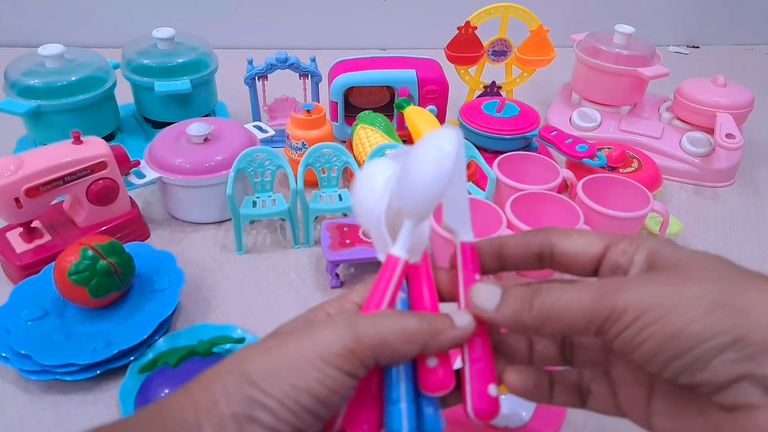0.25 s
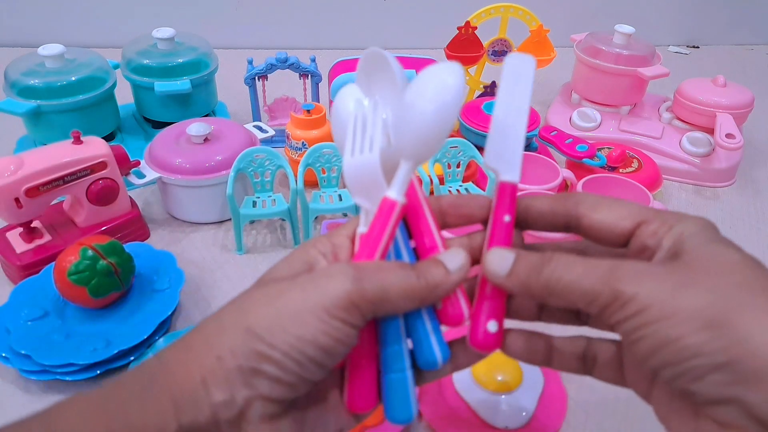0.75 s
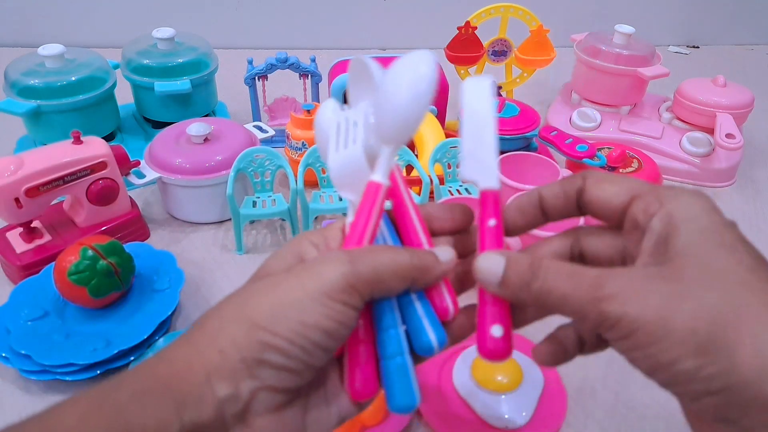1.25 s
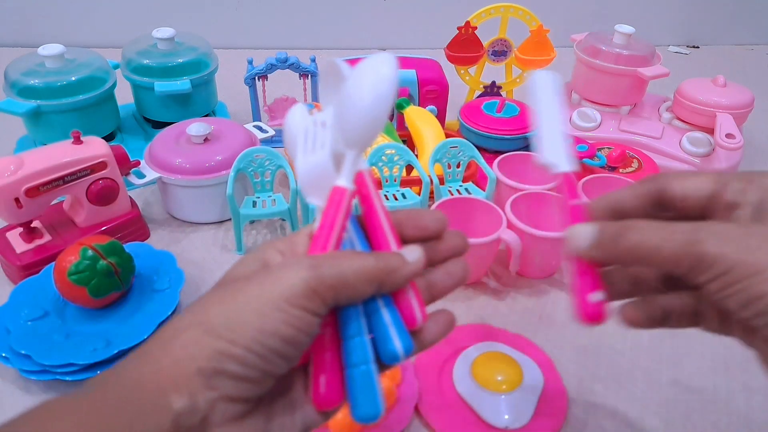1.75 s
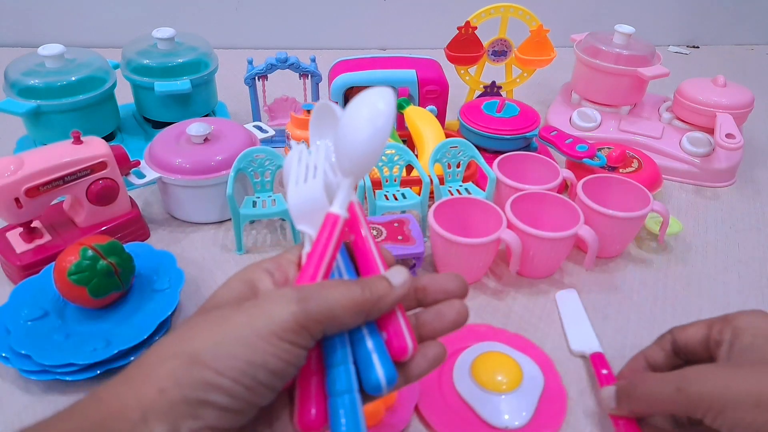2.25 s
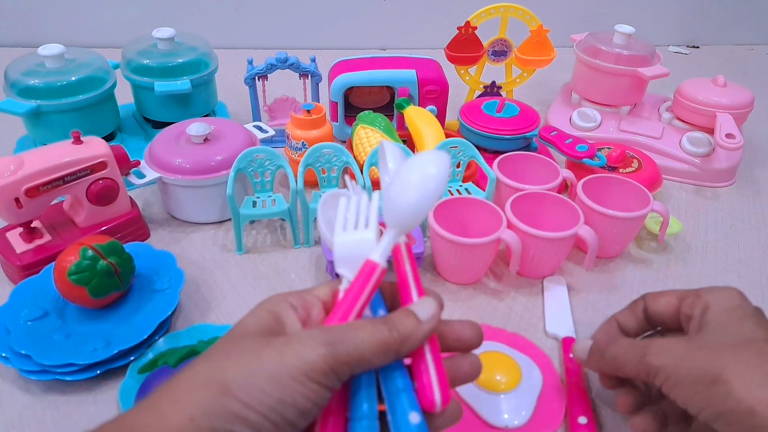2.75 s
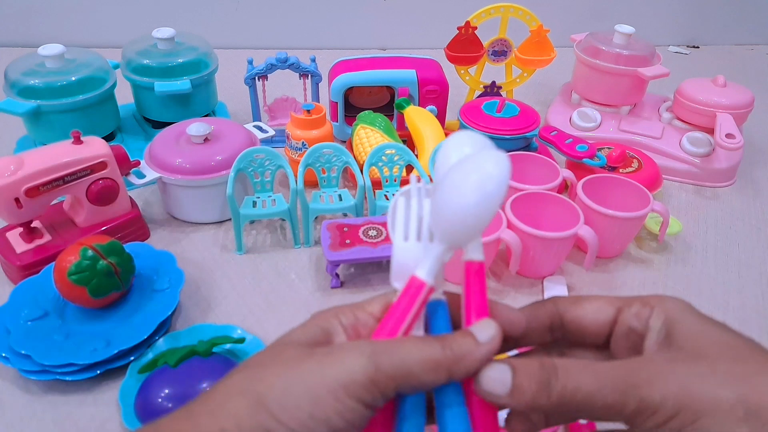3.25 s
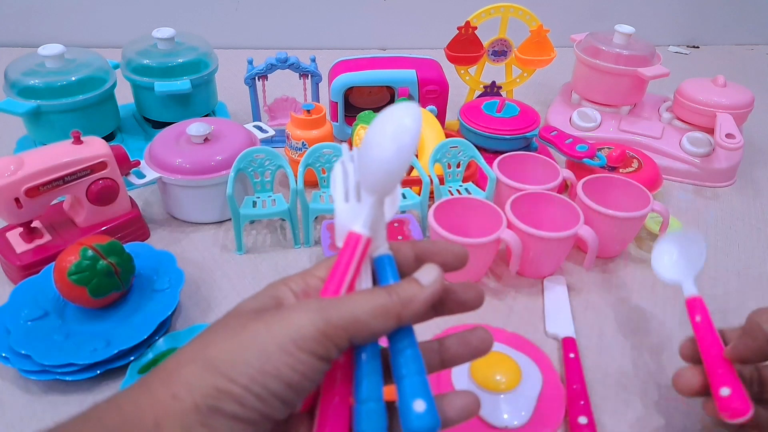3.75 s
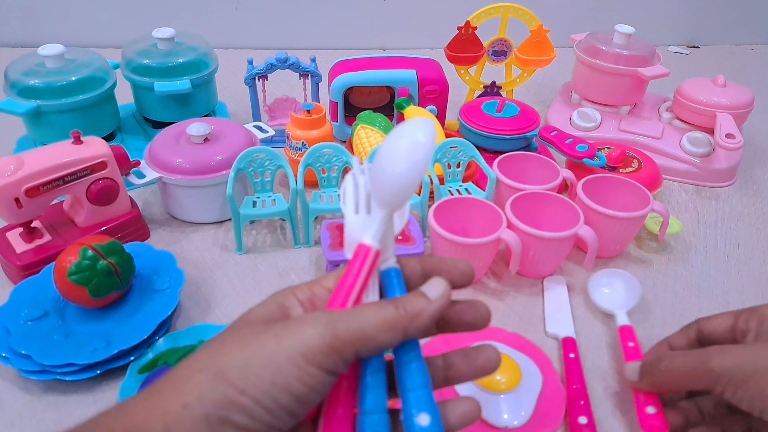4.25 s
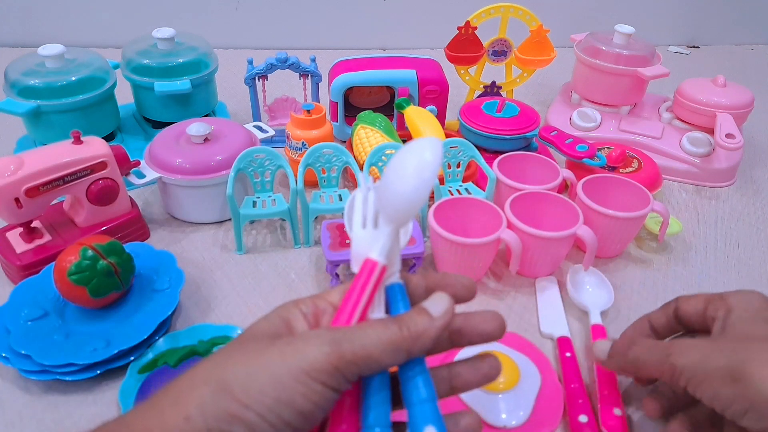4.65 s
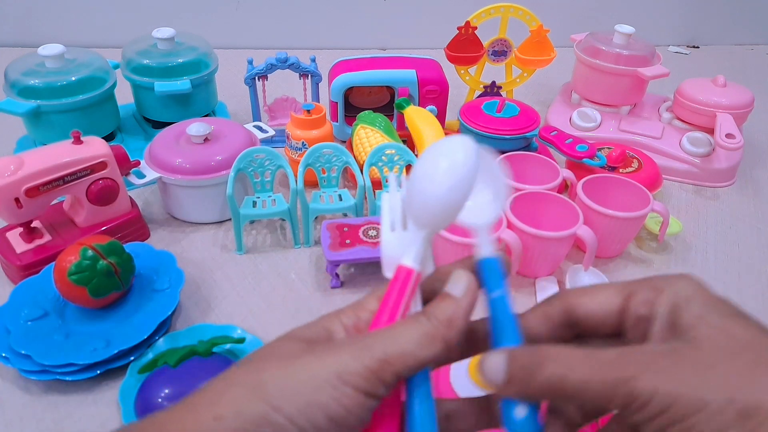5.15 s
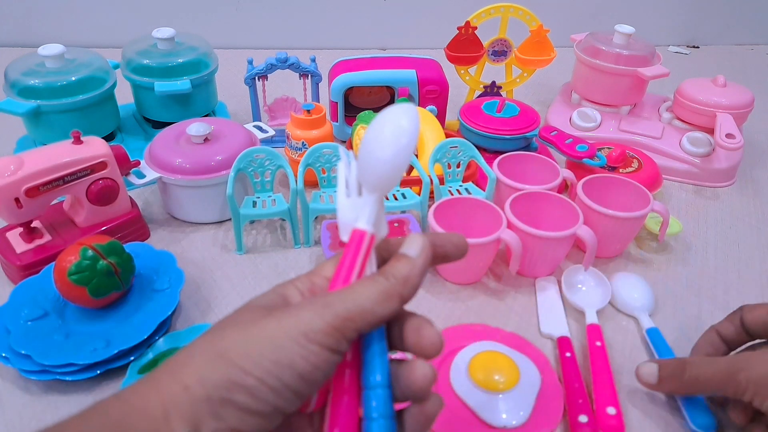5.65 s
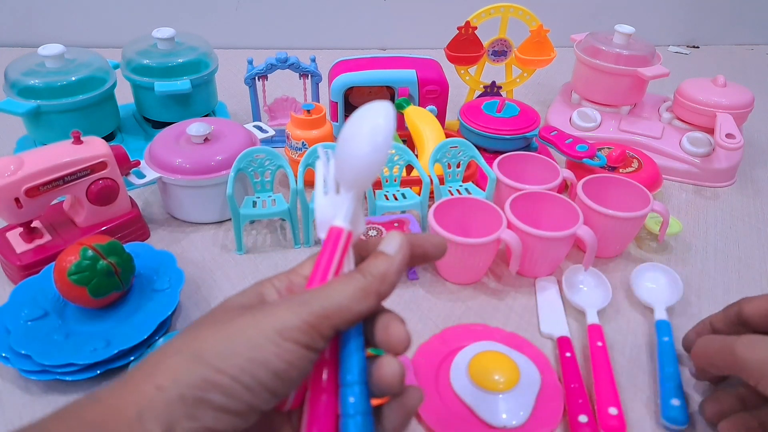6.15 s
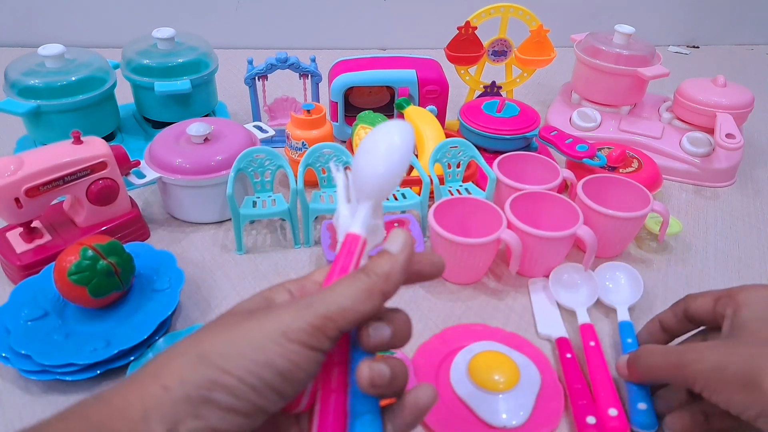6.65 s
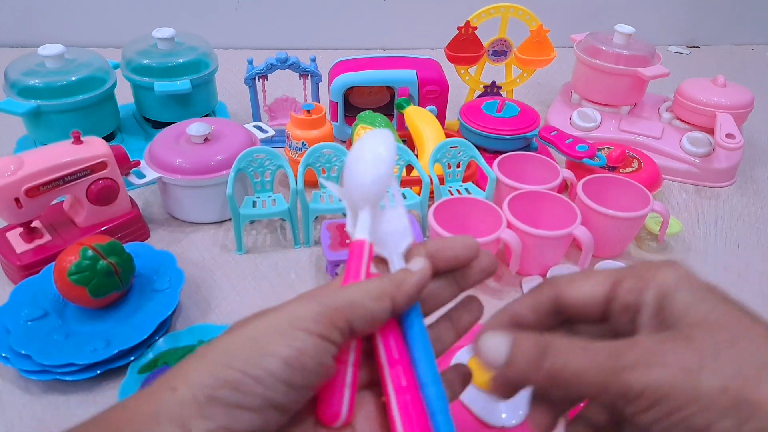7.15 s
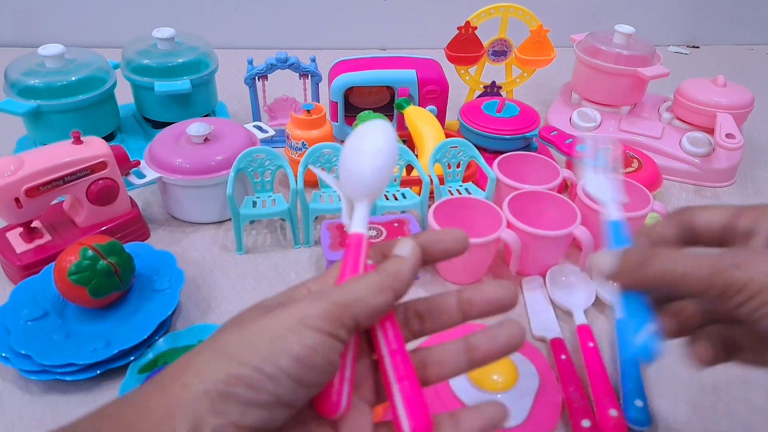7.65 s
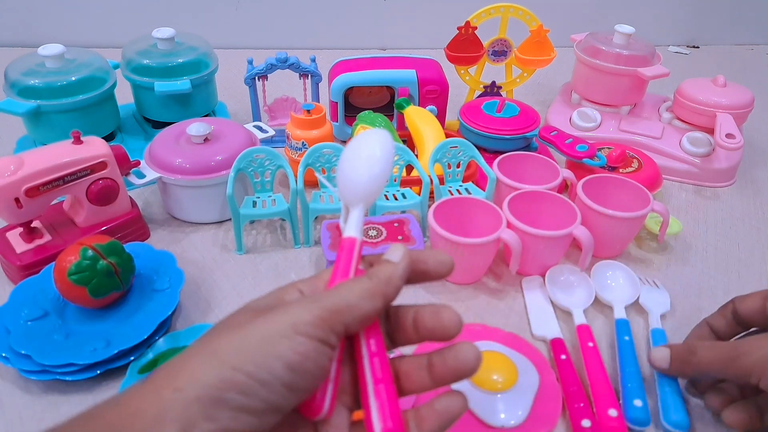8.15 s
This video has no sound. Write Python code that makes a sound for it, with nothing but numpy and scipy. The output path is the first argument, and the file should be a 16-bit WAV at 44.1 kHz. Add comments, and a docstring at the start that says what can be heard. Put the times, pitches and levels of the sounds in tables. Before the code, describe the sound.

Close-up handling of light plastic toy cutlery: dry, bright clicks in uneven little groups, separated by quiet gaps. Soft fluttering friction swells as pieces slide from the bunch, and firmer hollow taps land on the tabletop, the strongest just before six seconds. The small hard room answers briefly. A constant muffled rumble with a faint unsteady low hum fills the pauses, with barely any hiss.

```python
"""Over a dull steady rumble and a wavering low hum, hollow plastic toy cutlery ticks and taps in a small bare room.
Hands pull pieces from a bunch and lay them on a table: each contact is a crack plus a noise rattle through modes.
Soft noise swells around the ticks, fluttering bright and grainy dull, dying away at about the room's rate.
Decaying noise gives the echoes, filtered noise the rumble and hum. Two spaced microphones, the right one nearer."""
import sys
import numpy as np
from scipy import signal
from scipy.fft import rfft, irfft
from scipy.io import wavfile

SR = 44100
rng = np.random.default_rng(int(sys.argv[2]) if len(sys.argv) > 2 else 0)


def pcm_store(signal):
    """Save signal as 16-bit PCM."""
    levels = np.round(np.clip(np.atleast_2d(signal), -1, 1) * 32767)
    wavfile.write(sys.argv[1], SR, levels.astype(np.int16).T)


N = 370440

# Plastic contacts. Each row: start in s, bowl level in dB before resonances, then relative to the bowl
# table thud in dB, hollow handle in dB, bright tick in dB, top edge in dB; then left minus right in dB, room send in dB.
CONTACTS = [(0.153, -44, -33, -11.5, -1.5, -4, -1, -8), (0.1753, -53, -24, -8, 9.5, -2, -6, -7.5),
            (0.28, -73, -9, 11, 12, -3, 2, -3), (0.3669, -56.5, -22, -7, 5, -6, -2, -10),
            (0.521, -67.5, 9.5, -1, 9, 2, -1, -3.5), (0.6003, -57.5, -21, -1.5, -3, 5, 3, -20),
            (0.6154, -55, -25, -20, 2, -8, -8, -17), (0.6235, -45, -15.5, -16, 2.5, 7.5, -5, -6),
            (0.745, -68, 0.5, -30, 10.5, 12, -3, -2.5), (1.24, -64.5, -13.5, -10.5, -1, -8.5, -2, -7.5),
            (1.261, -54.5, 0, -15, 7.5, 4.5, -1, -11), (1.4174, -47, -11, -11.5, 4.5, -7.5, 3, -1.5),
            (1.4253, -24, -22, -23.5, -3.5, 0, -3, 1), (1.586, -33.5, -34.5, -12, -7, -14, 0, -2.5),
            (1.5963, -20, -28, -22.5, -12, -0.5, -5, 0.5), (2.049, -68.5, -2, -8.5, 9, 13, 1, 1),
            (2.3501, -67, -8, -2, 14.5, 27, -6, -13), (2.5382, -79.5, 4, 22, 9, -18, 2, 3),
            (2.971, -72, 6, -18, -15, -19, -6, 2), (3.115, -56.5, -26, -4.5, -3, -2, -7, -3.5),
            (3.9479, -39, -1, -16.5, -3, -0.5, -2, 2.5), (4.133, -34.5, -5, -3.5, -46, -8, -1.5, -0.5),
            (4.54, -53.5, -13, -19, -7, -20, -1, 2.5), (4.563, -61, -8, -9, -5, -20, -5, -8),
            (4.666, -40, -9.5, -3.5, -17, -26, -1, -2), (5.188, -71, -3.5, -17.5, 6, 23.5, -7, -5),
            (5.234, -68, 9, -8, 16.5, 26, -2, -7.5), (5.6841, -25, -15.5, -11.5, -2.5, -12.5, -1.5, 1),
            (5.6983, -26, -21, -16, -10.5, -10, -4, -2.5), (5.7302, -17, -15.5, -11.5, -5.5, -14, -0.5, 0),
            (5.7539, -32.5, -22.5, -6.5, -4.5, -15, -9, -5), (6.0485, -51.5, -11.5, -4, -12, -24, -3, -1),
            (6.061, -48.5, -19, 1.5, -9, -16.5, -3, -2.5),
            (6.2209, -27, -11.5, -5.5, -26.5, -4.5, -1.5, 1.5),
            (6.253, -19.5, -16.5, -11.5, -3.5, -17.5, -1.5, -3.5),
            (6.6332, -52, 1.5, -1.5, 7.5, 4.5, -2, -0.5), (6.6671, -53.5, 4.5, -3, 1, 1, -1, -3),
            (6.837, -67.5, -1.5, -10, 3.5, -9, -3, 6), (6.8742, -65, 14, -3, -9, -13, -1, 4.5),
            (6.9722, -65, 15.5, 15, 8, -11, 0, 4), (7.0177, -60.5, 15.5, 11, -5, -15, 0, -4),
            (7.0736, -59, -15, -23, 8.5, 8.5, -3, -7), (7.1106, -70.5, 20, 9, 0, -10, -1, -2),
            (7.2329, -60.5, -4, 10, 19, 19.5, 0, -6), (7.607, -81.5, -10, -20, 11, 4, 1, -12),
            (7.7567, -77.5, -9.5, -23.5, 27, 19.5, -1.5, -7.5), (8.064, -78, 11, -9.5, 17, 2, -7, 5),
            (8.1335, -24.5, -12.5, -10, -7.5, -16, -1.5, 1), (8.191, -40.5, -39, -7, -19, -4.5, -10, 0.5)]
# Clusters of modes too dense to tell apart in thin damped plastic, in the order thump, thud, handle, stem, bowl,
# bright tick, top edge. Each row: low edge in Hz, high edge in Hz, t60 in s, share alike in both microphones 0-1.
MODE_CLUSTERS = [(70, 210, 0.29, 0.93), (193, 564, 0.058, 0.98), (636, 1765, 0.097, 0.2),
                 (1750, 2900, 0.051, 0.03), (2930, 4940, 0.022, 0.2), (4960, 8600, 0.029, 0),
                 (8800, 14000, 0.015, 0.4)]
# Clearest modes of the piece in hand: knife, spoon, ladle, fork.
# Each row: in hand from s, three mode frequencies in Hz, their mean resonance gains in dB.
FREE_MODES = [(0, 2610, 3750, 5170, -5, -1, -4), (2.8, 1750, 2620, 3440, -18, -5, -6.5),
              (5.0, 2550, 3110, 4300, -7.5, -6, -7.5), (6.5, 1874, 3070, 4304, -8, -11.5, -10)]
# Table top under the toys. Each row: frequency in Hz, width in Hz, resonance gain in dB.
TABLE_MODES = [(113, 40, 1), (310, 43, 3), (420, 67, -2), (1106, 240, 4)]
FREE_MODE_WIDTH_HZ, RING_SPREAD_DB = 290, 2  # how strongly the free modes ring varies from contact to contact
THUMP_RE_THUD_DB = -12
STEM_FOLLOWS_HANDLE, STEM_OFFSET_DB = 0.6, 5  # share of the handle's dB, then offset
CRACK_RE_RATTLE = 4  # amplitude ratio at the microphones
RATTLE_TO_ROOM = 0.045  # rattle amplitude beside the unit crack sent to the walls; makes each tail's colour uneven
LEFT_LAG_S = 0.00016


def taps():
    """Contacts: a crack and short rattle excite every mode cluster; returns left, right and room-send rows."""
    start_s, bowl_db, thud_db, handle_db, bright_db, edge_db, pan_db, room_db = np.transpose(CONTACTS)
    stem_db = STEM_OFFSET_DB + STEM_FOLLOWS_HANDLE * handle_db
    cluster_db = [thud_db + THUMP_RE_THUD_DB, thud_db, handle_db, stem_db, 0, bright_db, edge_db]
    t = np.arange(SR // 14) / SR
    own, right = np.moveaxis(rng.standard_normal((len(start_s), 2, len(t))), 1, 0)
    ring_db = RING_SPREAD_DB * rng.standard_normal((len(start_s), 3))
    crack = np.broadcast_to(t == 0, own.shape)
    sound = 0
    for k, ((low_hz, high_hz, t60_s, share), colour_db) in enumerate(zip(MODE_CLUSTERS, cluster_db)):
        left = share * right + np.sqrt(1 - min(share, 1) ** 2) * own
        at_left = left + CRACK_RE_RATTLE * crack
        at_right = right + CRACK_RE_RATTLE * crack
        to_room = crack + RATTLE_TO_ROOM * own
        dying = np.array([at_left, at_right, to_room]) * from_db(-60 * t / t60_s)
        band = bandpass(dying + 1e-18, low_hz, high_hz)
        level = np.sqrt(np.sum(band ** 2, axis=2, keepdims=True) / (SR * 0.002))  # energy as if spread over 2 ms
        sign = (-1) ** k  # alternates so that neighbouring clusters join
        sound = sound + sign * band / level * from_db(bowl_db + colour_db)[:, None]
    out = np.zeros((3, N + SR))
    path_gains = from_db([pan_db / 2, -pan_db / 2, room_db])
    for k, at_s in enumerate(start_s):
        piece = [row for row in FREE_MODES if row[0] <= at_s][-1]
        free = [(hz, FREE_MODE_WIDTH_HZ, db + extra) for hz, db, extra in zip(piece[1:4], piece[4:], ring_db[k])]
        ringing = add_resonances(sound[:, k], free)
        for path, lag_s in enumerate([LEFT_LAG_S, 0, 0]):
            i = round((at_s + lag_s) * SR)
            out[path, i:i + len(t)] += path_gains[path, k] * ringing[path]
    return add_resonances(out[:, :N], TABLE_MODES)


# Soft noise swells around the ticks. Each row: time of full level in s, rise in s, hold in s,
# nominal bright level in dB, nominal dull level in dB.
SWELLS = [(0.0, .01, 0.033, -71, -91), (0.136, 0.024, 0.049, -60, -73), (0.306, .06, 0.011, -54.5, -75),
          (0.471, 0.035, 0.11, -65.5, -86), (0.621, 0.027, 0.035, -55.5, -62), (1.025, 0.2, .0, -74, -75.5),
          (1.102, 0.045, .0, -75, -76), (1.272, 0.085, 0.0052, -58, -68), (2.068, 0.031, .0, -66.5, -80),
          (2.362, 0.019, 0.0031, -56.5, -62.5), (2.54, 0.031, 0.16, -73.5, -63),
          (3.119, 0.018, 0.037, -67, -73), (3.497, 0.14, 0.077, -77, -74.5),
          (4.27, 0.044, 0.0092, -68, -62), (4.302, .02, 0.073, -66.5, -64),
          (4.556, 0.068, 0.0043, -70, -58.5), (5.081, .03, 0.019, -73, -90.5),
          (5.191, 0.054, .0, -66.5, -78.5), (5.238, 0.017, 0.0074, -63.5, -78.5),
          (6.64, 0.22, 0.032, -54, -55), (6.886, 0.14, .0, -71, -56.5), (7.022, 0.11, 0.0086, -57, -60),
          (7.241, 0.021, 0.02, -54, -69), (7.565, 0.13, .0, -72.5, -78), (7.755, 0.093, .0, -69.5, -89)]
# Bright noise colour. Each row: frequency in Hz, relative density in dB.
BRIGHT_COLOUR = [(1180, -28), (2000, -5), (2620, -16.5), (2860, -12.5), (4820, -9), (7770, -8),
                 (16000, -13.5)]
# Dull noise colour. Each row: frequency in Hz, relative density in dB.
DULL_COLOUR = [(350, -45), (600, -4.5), (914, -5), (1220, -7.5), (1390, -13), (2560, -11.5), (4000, -33),
               (5200, -43.5), (8800, -120)]
BRIGHT_DECAY_DB_PER_S, DULL_DECAY_DB_PER_S = 150, 168.5  # about the room's own rate
BRIGHT_FLOOR_DB, DULL_FLOOR_DB = -84, -77.5  # nominal level between swells


def noise_swells():
    """Soft noise around the ticks: a fluttering bright part and a grainy dull part with the table resonances."""
    bright_db, dull_db = np.transpose(SWELLS)[3:]
    bright = rms_one(diffuse_noise(N, BRIGHT_COLOUR)) * from_db(1.7 * drift(60))
    bright = bright * swell_gain(bright_db, BRIGHT_DECAY_DB_PER_S, BRIGHT_FLOOR_DB)
    grainy = diffuse_noise(N, DULL_COLOUR) * grains()
    dull = rms_one(add_resonances(grainy, TABLE_MODES)) * from_db(1.0 * drift(40))
    dull = dull * swell_gain(dull_db, DULL_DECAY_DB_PER_S, DULL_FLOOR_DB)
    return (bright + dull) * from_db([[-1.5], [1.5]])  # left, right


ONSET_DB = 27  # slope of the onset: this many dB per rise time


def swell_gain(peaks_db, decay_db_per_s, floor_db):
    """Gain over time: each swell grows, holds and dies away at a steady dB rate over a floor; powers add."""
    t = np.arange(N) / SR
    power = from_db(2 * floor_db)
    for (full_s, rise_s, hold_s, *_), peak_db in zip(SWELLS, peaks_db):
        before_db = ONSET_DB * np.maximum(full_s - t, 0) / max(rise_s, 0.002)
        after_db = decay_db_per_s * np.maximum(t - full_s - hold_s, 0)
        below_db = np.minimum(before_db + after_db, 90)
        power = power + from_db(2 * (peak_db - below_db))
    return np.sqrt(power)


GRAINS_PER_S, GRAIN_DECAY_S = 180, 0.002
GRAIN_MIN_DB, GRAIN_SPREAD_DB = -4, 4.0  # smallest grain against the steady gain, scale of the excess


def grains():
    """Short decaying gain bumps of uneven size at random moments over a steady gain."""
    sizes = from_db(GRAIN_MIN_DB + GRAIN_SPREAD_DB * np.minimum(rng.exponential(1, N), 4))
    bumps = sizes * (rng.random(N) < GRAINS_PER_S / SR)
    decay = np.exp(-1 / (GRAIN_DECAY_S * SR))
    return rms_one(1 + signal.lfilter([1], [1, -decay], bumps))


# Reverberation time. Each row: frequency in Hz, t60 in s.
ROOM_T60 = [(200, 0.87), (530, 0.53), (1390, 0.43), (3680, 0.39), (9700, 0.35)]
# Echo colour, also the hum's source noise. Each row: frequency in Hz, relative density in dB.
ROOM_COLOUR = [(100, -11.5), (250, -3), (600, 0.5), (1500, 1.5), (4000, 2.5), (7000, 0.5), (9000, 0),
               (11000, 1.5), (16000, -1)]
ROOM_GAIN_DB = -37
WALLS_S, EARLY_DB = 0.023, -6.5  # time until the walls answer, gain of the first echoes


def room(x):
    """Reverberation: thin echoes off table and toys, then the walls answer and die away band by band."""
    t = np.arange(SR) / SR
    edges_hz = 100 * 2 ** np.arange(0, 7.6, 0.5)
    noise = diffuse_noise(SR, ROOM_COLOUR)
    tail = 0
    for k, (low_hz, high_hz) in enumerate(zip(edges_hz, edges_hz[1:])):
        t60_s = at_hz(ROOM_T60, np.sqrt(low_hz * high_hz))
        tail = tail + (-1) ** k * bandpass(noise, low_hz, high_hz) * from_db(-60 * t / t60_s)
    build_up = from_db(EARLY_DB * np.clip(1 - t / WALLS_S, 0, 1) ** 0.23)
    return from_db(ROOM_GAIN_DB) * signal.fftconvolve(x[None], tail * build_up, axes=1)[:, :N]


# Steady rumble colour. Each row: frequency in Hz, relative density in dB.
RUMBLE_COLOUR = [(15, -59), (25, -19), (36, -22.5), (53, -18), (145, -13), (256, -4.5), (373, -4),
                 (416, -0.5), (503, -5), (734, -18.5), (1230, -17.5), (2610, -29), (4370, -43),
                 (11900, -37.5), (16000, -56.5)]
# Standing waves between the walls. Each row: frequency in Hz, width in Hz, resonance gain in dB.
ROOM_MODES = [(105, 28, 10.5), (180, 4.7, -1.5), (217, 12, 4.5), (252, 12, 1), (310, 16, 2), (342, 7.6, -2),
              (384, 18, -0.5), (439, 20, 3.5), (475, 8.2, 1)]
# Wavering hum near 60 Hz. Each row: time in s, level in dB before the left-right tilt.
HUM_LEVEL = [(0.0, -77), (1.42, -71), (1.45, -69), (2.43, -87.5), (2.95, -64.5), (3.41, -74.5),
             (5.26, -65.5), (5.69, -84.5), (5.76, -67), (7.51, -83), (8.26, -71.5), (8.4, -80)]
RUMBLE_DB = -60  # mean, before the left-right tilt


def background():
    """Rumble is gently swelling noise with standing-wave resonances; hum is noise in a narrow band."""
    rumble = rms_one(add_resonances(diffuse_noise(N, RUMBLE_COLOUR), ROOM_MODES))
    rumble = rumble * from_db(RUMBLE_DB + 0.5 * drift(1.0))
    hum = rms_one(bandpass(diffuse_noise(N, ROOM_COLOUR), 54, 68))
    hum = hum * from_db(in_time(HUM_LEVEL)[0])
    return (rumble + hum) * from_db([[-0.4], [0.4]])  # left, right


# Left-right likeness of diffuse sound. Each row: frequency in Hz, correlation 0-1.
LIKENESS = [(100, .93), (350, 0.94), (600, 0.29), (1200, 0.), (16000, 0.064)]


def diffuse_noise(size, spectrum):
    """Coloured stereo noise, strongly alike in both microphones only in the bass."""
    hz = np.maximum(np.fft.rfftfreq(size, 1 / SR), 1)
    mid, side = rfft(rng.standard_normal((2, size))) * from_db(at_hz(spectrum, hz))
    alike = np.clip(at_hz(LIKENESS, hz), 0, 1)
    return irfft(np.sqrt(1 + alike) * mid + np.sqrt(1 - alike) * side * [[1], [-1]], size)


def add_resonances(x, modes):
    """The sound plus parallel two-pole resonances (Hz, width Hz, gain dB)."""
    out = x
    for hz, width_hz, gain_db in modes:
        r = np.exp(-np.pi * width_hz / SR)
        zeros = [(1 - r * r) / 2, 0, (r * r - 1) / 2]
        poles = [1, -2 * r * np.cos(2 * np.pi * hz / SR), r * r]
        out = out + from_db(gain_db) * signal.lfilter(zeros, poles, x + 1e-18)
    return out


def bandpass(x, low_hz, high_hz):
    """Butterworth band of the sound."""
    return signal.sosfilt(signal.butter(2, [low_hz, high_hz], "band", fs=SR, output="sos"), x)


def drift(corner_hz):
    """Random wander with spread 1: noise through two equal poles, run at SR / 40."""
    r = np.exp(-80 * np.pi * corner_hz / SR)
    slow = signal.lfilter([1], [1, -2 * r, r * r], rng.standard_normal(N // 40 + 2002))[2000:]
    return np.interp(np.arange(N) / 40, np.arange(len(slow)), rms_one(slow))


def from_db(db):
    """Gain of a level in dB."""
    return 10 ** (np.asarray(db) / 20)


def rms_one(x):
    """Scaled to rms 1."""
    return x / np.sqrt(np.mean(x ** 2) + 1e-20)


def in_time(rows):
    """Curve columns at every sample."""
    s, *columns = np.transpose(rows)
    return [np.interp(np.arange(N) / SR, s, c) for c in columns]


def at_hz(points, hz):
    """A (Hz, value) table read on a log frequency axis."""
    table_hz, values = np.array(points).T
    return np.interp(np.log(hz), np.log(table_hz), values)


def scene():
    """Contacts and soft noise swells, their echoes and the background."""
    contacts, swells = taps(), noise_swells()
    echoes = room(contacts[2] + 0.17 * swells[1]) * from_db([[-1.5], [1.5]])
    return contacts[:2] + swells + echoes + background()


# Dip of the microphone ports. Each row: frequency in Hz, width in Hz, removed share in dB.
PORT_DIP = [(9000, 620, -8.5)]
HISS_DB, HISS_FROM_HZ = -85, 9200  # self-noise: white level before the high-pass, its corner
STOPBAND_HZ = 16800


def record(dry):
    """Microphones hiss faintly, dip near 9 kHz and lose the deepest bass; the top is cut steeply."""
    hiss_filter = signal.butter(2, HISS_FROM_HZ, "high", fs=SR, output="sos")
    hiss = signal.sosfilt(hiss_filter, rng.standard_normal(dry.shape))
    dipped = 2 * dry - add_resonances(dry, PORT_DIP)  # subtracts the resonance
    noisy = dipped + from_db(HISS_DB) * hiss
    thinned = signal.sosfilt(signal.butter(1, 20, "high", fs=SR, output="sos"), noisy)
    return signal.sosfilt(signal.cheby2(16, 90, STOPBAND_HZ, fs=SR, output="sos"), thinned)


dry = scene()
out = record(dry)
pcm_store(out)
```